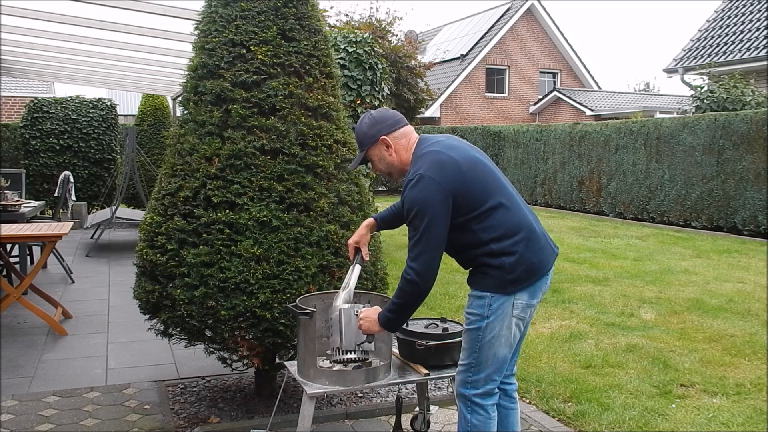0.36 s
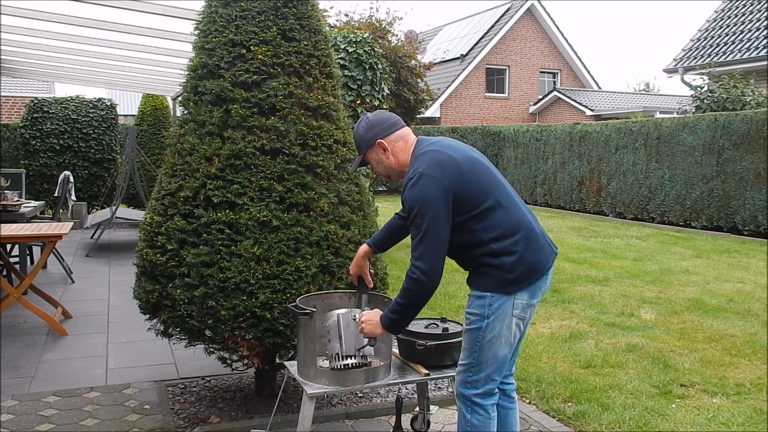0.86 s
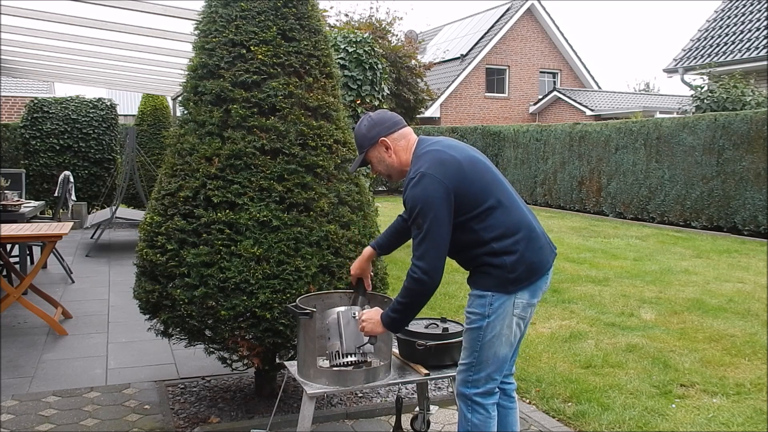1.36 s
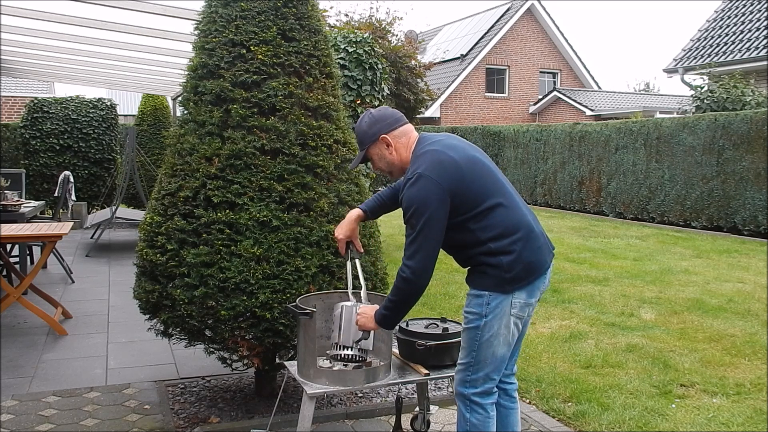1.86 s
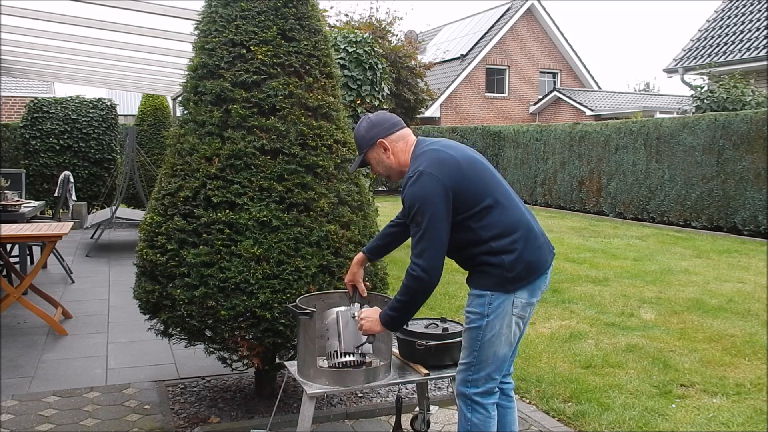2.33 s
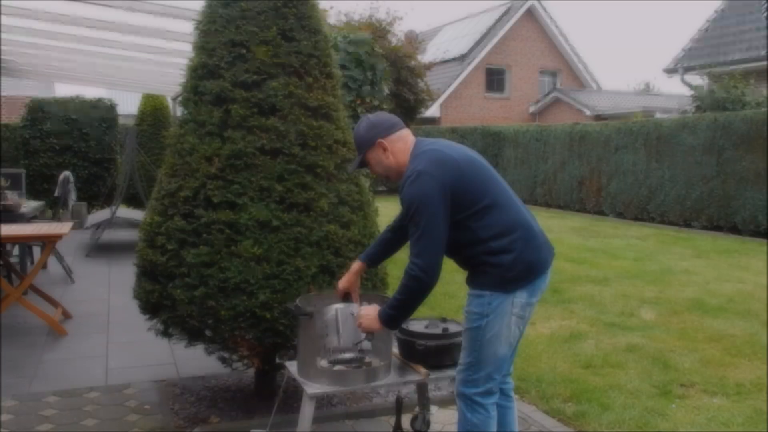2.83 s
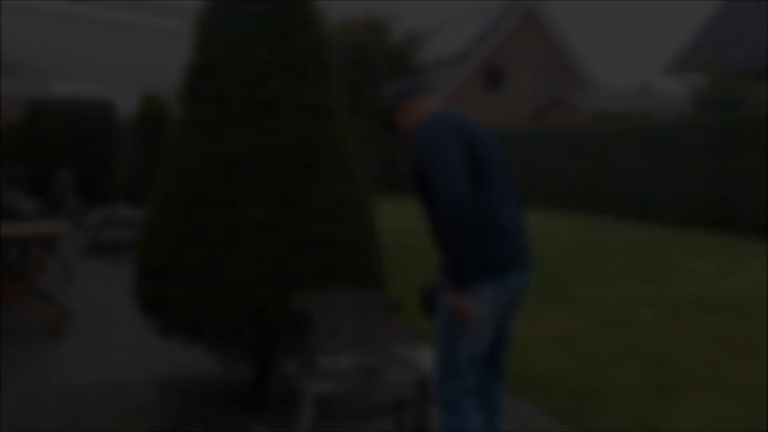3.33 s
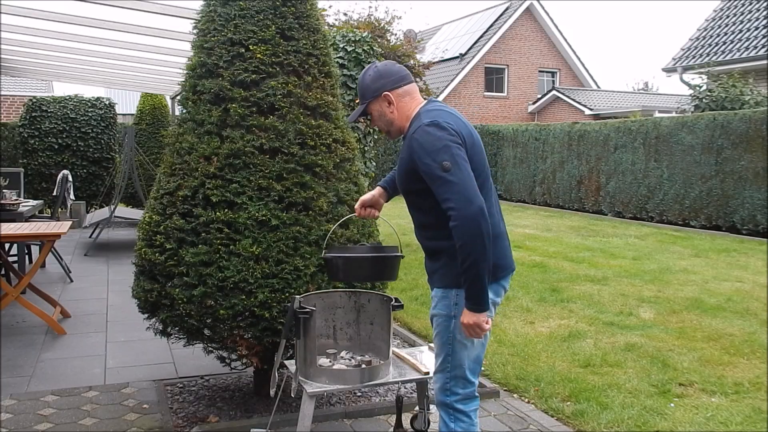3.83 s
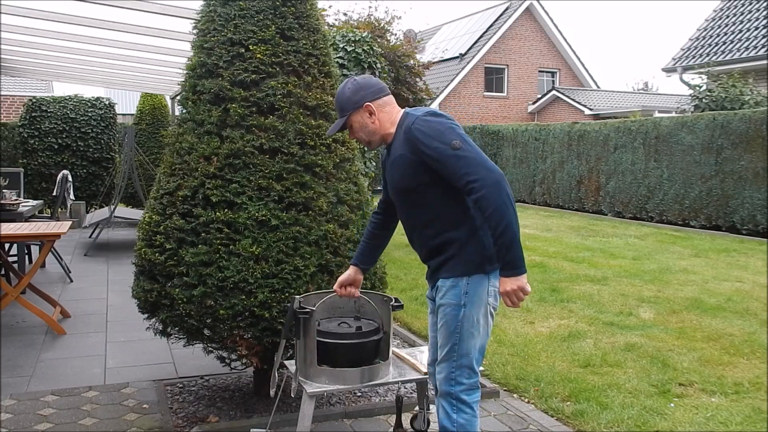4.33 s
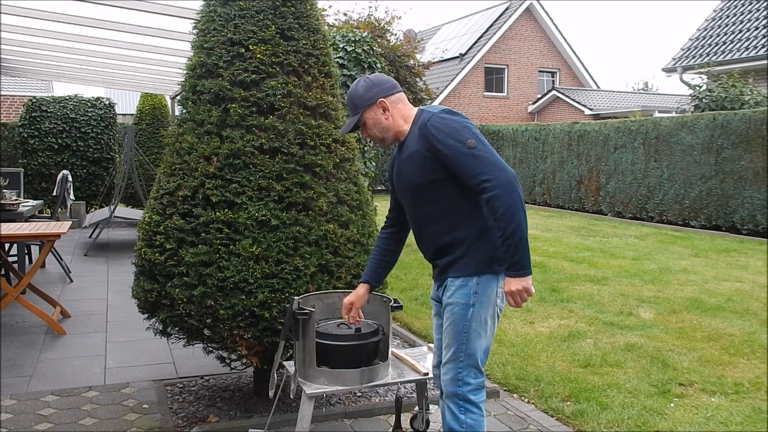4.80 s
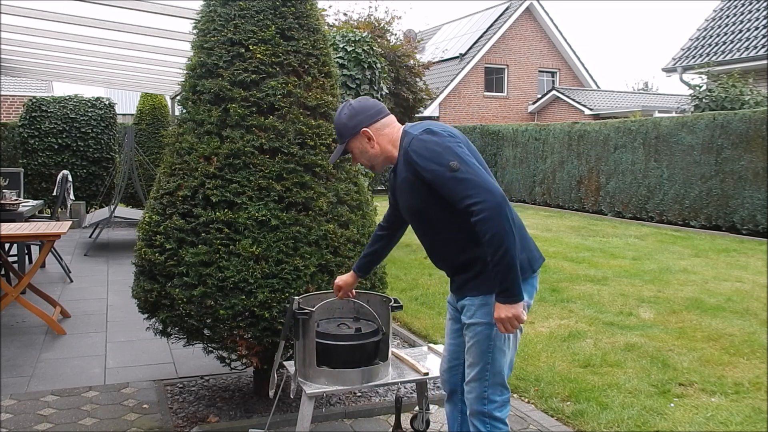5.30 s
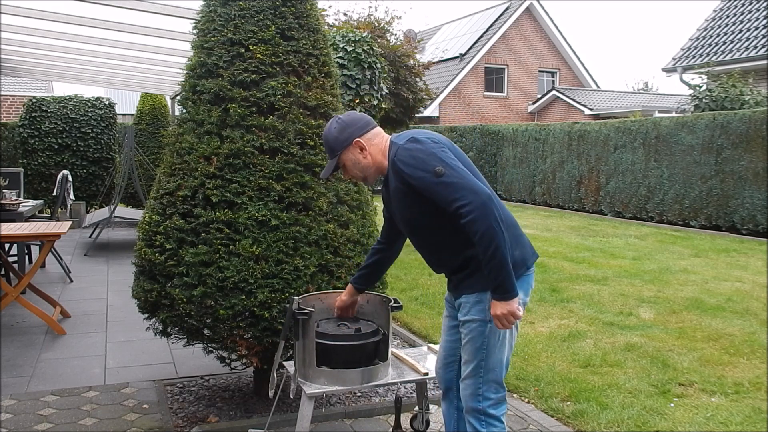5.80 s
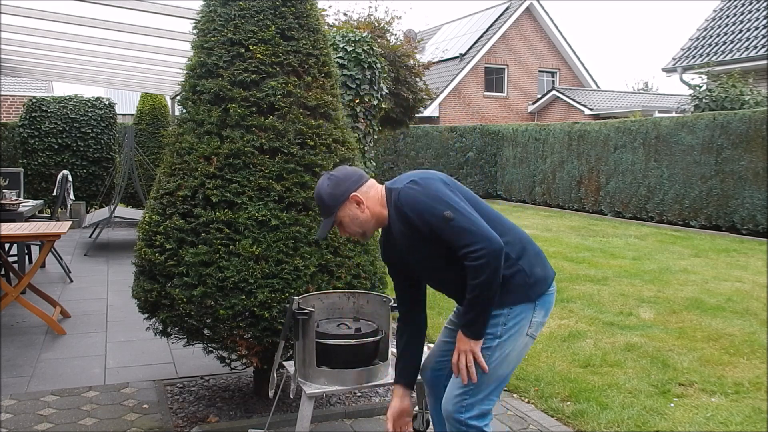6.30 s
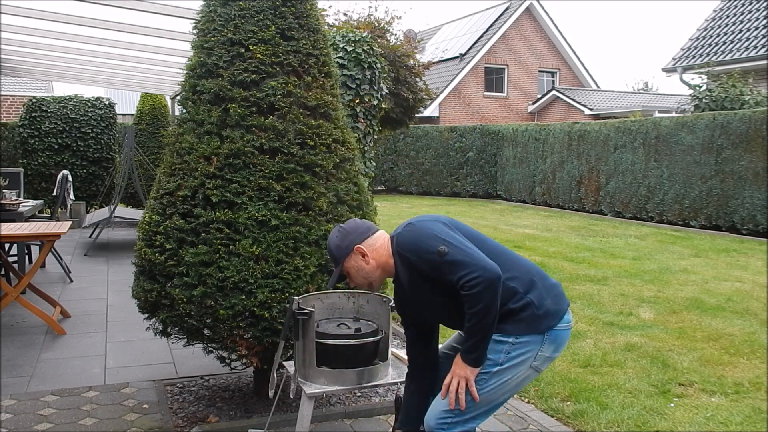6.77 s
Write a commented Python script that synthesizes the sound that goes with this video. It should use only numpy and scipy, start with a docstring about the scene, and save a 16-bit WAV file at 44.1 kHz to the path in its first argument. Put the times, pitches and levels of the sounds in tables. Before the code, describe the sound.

Coals and metal tongs knock a booming thin steel can in a quiet garden, then a cast-iron pot crunches down and its wire handle ticks and drops.

```python
"""A sheet-steel can booms softly at each knock as tongs lift hot coals out of it in a garden; the tongs clink.
A cast-iron pot grinds down onto the coals, its wire handle ticks and drops on the rim, the can is lifted again.
Each contact sums decaying modes of the struck body with a gritty noise burst, set in three frequency ranges.
Distant traffic and leaves, as shaped noise, fill the gaps; a small stereo camera listens from a few metres."""
import sys
import numpy as np
from scipy import signal
from scipy.fft import rfft, irfft
from scipy.io import wavfile
from scipy.ndimage import uniform_filter1d

SR = 44100
rng = np.random.default_rng(int(sys.argv[2]) if len(sys.argv) > 2 else 0)


def gain_from_db(level_db):
    """Turn a decibel level (scalar or array-like) into a linear amplitude factor."""
    decades = np.asarray(level_db, float) / 20
    return 10 ** decades


def log_audio(samples):
    """Write samples as a 16-bit WAV file to the path given in sys.argv[1]."""
    # one column per channel
    frames = np.atleast_2d(samples).T
    # limit to full scale, then quantise
    limited = np.clip(frames, -1, 1)
    pcm = np.round(limited * 32767).astype(np.int16)
    wavfile.write(sys.argv[1], SR, pcm)


N = 315315  # samples in the scene
BASS_HZ, TREBLE_HZ = 1200, 4000  # edges between bass, middle and treble
SPAN = 12288  # samples kept of each contact
T = np.arange(SPAN) / SR  # time since the contact began [s]


def shape(hz, points):
    """Filter magnitude: interpolates (frequency [Hz], gain [dB]) points on a logarithmic frequency axis."""
    f, db = np.transpose(points)
    return gain_from_db(np.interp(np.log(hz + 1), np.log(f), db))


def walk(rate):
    """Low-pass random modulation: levels held 1 / rate s and slewed twice, with a spread near 1."""
    k = int(SR / rate)
    held = np.repeat(rng.standard_normal(N // k + 1), k)
    return 1.6 * uniform_filter1d(uniform_filter1d(held, k), k)[:N]


def thirds(hz):
    """Complementary crossover: treble, middle and bass shares of a spectrum, adding up to 1."""
    above_treble, above_bass = [1 / (1 + (edge / (hz + 1)) ** 6) for edge in (TREBLE_HZ, BASS_HZ)]
    return above_treble, above_bass - above_treble, 1 - above_bass


def pan(x, left_over_right_db):
    """Interchannel level difference: half the decibels go to each side."""
    return x * gain_from_db(np.array([[left_over_right_db], [-left_over_right_db]]) / 2)


# spectral slope of traffic and leaves: (frequency [Hz], relative level [dB])
GARDEN_SPECTRUM = [(18, -26), (38, -15), (58, -40), (76, -10), (105, -1.5), (157, 2.5), (200, -2.5),
                   (240, -8), (437, -8), (499, -10.5), (801, -14.5), (1130, -18.5), (3400, -24.5),
                   (16000, -38)]
# raised hissy bands: (frequency [Hz], width [Hz], gain at the centre [dB])
HISS_BANDS = [(2267, 110, 10), (3425, 200, 8.5), (7440, 560, 5), (9770, 930, 2.5)]
# rms level of each range before panning: (time [s], rumble [dB], low middle [dB], middle [dB], treble [dB])
BACKGROUND_LEVELS = [(0.0, -65, -64, -66, -70), (0.44, -67, -65.5, -65.5, -69),
                     (2.69, -64, -66, -66.5, -69.5), (2.9, -65, -61.5, -63.5, -65.5),
                     (3.5, -64, -61, -62, -63.5), (3.842, -65.5, -69, -67, -68.5),
                     (6.0, -69.5, -65.5, -66, -68.5), (6.4, -67, -66, -66, -63.5),
                     (6.8, -73, -70.5, -64.5, -70), (7.15, -63, -65.5, -67, -65)]


def garden():
    """Partly correlated shaped noise: octave bands flicker independently, four broad ranges follow their own
    levels over time; the background is louder around 2.8-3.8 s."""
    hz, t = np.fft.rfftfreq(N, 1 / SR), np.arange(N) / SR
    # the two ports hear much of it alike
    unlike = shape(hz, [(60, -13.0), (300, -5.0), (1000, -4.5), (4000, -4.5), (14000, -1.5)])
    hiss_db = sum(db / (1 + (2 * (hz - f) / width) ** 2) for f, width, db in HISS_BANDS)
    mid, side = rfft(rng.standard_normal((2, N))) * shape(hz, GARDEN_SPECTRUM) * gain_from_db(hiss_db)
    pair = np.array([mid + unlike * side, mid - unlike * side])
    noise = 0
    for centre in 45 * 2. ** np.arange(9):
        octave = np.cos(np.pi / 2 * np.clip(np.log2((hz + 1) / centre), -1, 1)) ** 2
        flicker_db = (2 if centre < 400 else 1.4) * walk(6)
        noise = noise + irfft(octave * pair, N) * gain_from_db(flicker_db)
    treble, middle, bass = thirds(hz)
    rumble = 1 / (1 + (hz / 300) ** 4)
    s, *range_db = np.transpose(BACKGROUND_LEVELS)
    out = 0
    for share, db in zip((rumble, bass - rumble, middle, treble), range_db):
        part = irfft(share * rfft(noise), N)
        out = out + part / part.std() * gain_from_db(np.interp(t, s, db))
    return pan(out, -0.35)


def yard(x, t60=0.2, wet_db=-22, unlike=0.22):
    """Diffuse reflection: paving, hedge and house wall send back a short, exponentially decaying scatter."""
    t = np.arange(int(.4 * SR)) / SR
    envelope = np.exp(-np.log(1000) * t / t60) * np.clip(t / 0.036, 0, 1) ** 2
    mid, side = rng.standard_normal((2, len(t))) * envelope
    side = unlike * np.diff(side, prepend=0)
    tail = np.array([mid + side, mid - side]) / np.sqrt(np.sum(mid ** 2))
    return gain_from_db(wet_db) * signal.fftconvolve(x.mean(0)[None], tail, axes=1)[:, :N]


def near_spot(hz, spot_hz, focus_db):
    """Selective excitation: the spot struck favours frequencies close to spot_hz."""
    return gain_from_db(focus_db * np.exp(-(np.log((hz + 1) / spot_hz) / 0.071) ** 2))


def ring_modes(modes, contact, spot_hz, focus_db, scatter_db):
    """Modal superposition: damped sinusoids, sustained while in contact and slightly different each time."""
    f, width, db = np.transpose(modes)[:, :, None]
    strength = gain_from_db(db + scatter_db * rng.standard_normal(f.shape)) * near_spot(f, spot_hz, focus_db)
    # the hold pulls the nearest mode onto the favoured pitch
    off = np.abs(np.log(f / spot_hz))
    strayed = f * (1 + 0.005 * rng.standard_normal(f.shape))
    held = np.where((off == off.min()) & (off < .08), spot_hz, strayed)
    # while the parts still rub, high modes are kicked out of step; they turn gritty above 5130 Hz
    kicks = rng.standard_normal((len(f), SPAN // 8)).repeat(8, axis=1) * (T < contact)
    slip = np.cumsum(kicks * np.sqrt(width / SR) * f / 5130, axis=1)
    # a blow starts the modes nearly in step
    wave = np.sin(2 * np.pi * (held * T + 0.38 * rng.random(f.shape)) + slip)
    decay = np.exp(-np.pi * width * np.maximum(T - contact, 0))
    return np.sum(strength * wave * decay, axis=0)


def rough_noise(crack_db, grit):
    """Impulsive noise: a sharp crack at first touch, then loose parts chatter every few milliseconds."""
    # a few grains bite harder than the rest
    bites = gain_from_db(grit * uniform_filter1d(np.minimum(rng.exponential(size=SPAN), 4) ** 2, size=8))
    steps = np.repeat(rng.standard_normal(SPAN // 128), 128)
    chatter = gain_from_db(1.5 * uniform_filter1d(steps, size=64))
    crack = 1 + gain_from_db(crack_db) * np.exp(-T / 0.00061)
    return rng.standard_normal((2, SPAN)) * bites * chatter * crack


def strike(contacts, modes, ring_db, fade_s, soft, crack_db, grit, scatter_db, focus_db,
           low_hz, dip_db, top_db, pan_db, wide_db):
    """Contact excitation: each blow rings the modes near its spot over a gritty fading clatter.

    contacts: (time [s], treble, middle, bass peak [dB], contact [s], favoured frequency [Hz]).
    ring_db (ring over clatter) and fade_s hold treble, middle, bass."""
    out, hz = np.zeros((2, N + SPAN)), np.fft.rfftfreq(SPAN, 1 / SR)
    slope = shape(hz, [(low_hz / 6, -70), (low_hz / 2, -24), (low_hz, 0), (2200, 0),
                       (3200, dip_db), (7000, 0), (16000, top_db)])
    radiates = shape(hz, [(60, -40), (300, 0)])
    apart = shape(hz, [(500, wide_db - 36.0), (10000, wide_db)])
    for s, *peak_db, contact, spot_hz in contacts:
        after = np.maximum(T - contact, 0)
        rise = np.sin(np.pi / 2 * np.clip(T / (soft * contact + 0.0018), 0, 1)) ** 2
        ring = rfft(rise * ring_modes(modes, contact, spot_hz, focus_db, scatter_db)) * radiates
        noise = rough_noise(crack_db, grit) * rise
        # countless small modes give each contact its own ragged colour
        ragged = gain_from_db(3.5 * np.interp(hz, np.linspace(0, SR / 2, num=120), rng.standard_normal(size=120)))
        colour = slope * ragged * np.sqrt(near_spot(hz, spot_hz, focus_db))
        pair, k = 0, int(s * SR)
        for share, top, sing_db, fade in zip(thirds(hz), peak_db, ring_db, fade_s):
            # longer contacts shake more loose parts, which settle later
            settle = np.exp(-np.log(1000) * after / (fade + 3 * contact))
            clatter = rfft(noise * settle) * colour * share
            tone = share * ring
            power = np.sum(np.abs(clatter[0]) ** 2) / (np.sum(np.abs(tone) ** 2) + 1e-9)
            mid = irfft(clatter[0] + gain_from_db(sing_db) * np.sqrt(power) * tone)
            side = irfft(apart * clatter[1]) * np.hypot(1, gain_from_db(sing_db))
            peak = np.sqrt(uniform_filter1d(mid ** 2, size=88).max())  # loudest 2 ms
            pair = pair + gain_from_db(top) / peak * np.array([mid + side, mid - side])
        out[:, k:k + SPAN] += pair * np.clip(4 - 4 * T / T[-1], 0, 1)
    return pan(out[:, :N], pan_db)


def follow(lead_db, base_db, gain):
    """Level law: a range sits at base_db when the leading one is at -45 dB, and gains `gain` dB per dB."""
    return base_db + gain * (lead_db + 45)


# the can's loose grip rattling: (time [s], treble peak [dB], contact [s], favoured frequency [Hz])
GRIP_RATTLES = [(6.586, -53, 0.036, 11000), (6.5972, -46.5, 0.0066, 4600), (6.6409, -40.5, 0.0031, 8560),
                (6.651, -41.5, 0.0068, 8500), (6.6696, -54, 0.023, 8240), (6.702, -42.5, 0.012, 9620),
                (6.7306, -37.5, 0.0051, 13000), (6.759, -51.5, 0.015, 9100), (6.819, -48.5, 0.0055, 11400),
                (6.827, -44.5, 0.0094, 6100)]
# vibration modes of the grip: (frequency [Hz], width [Hz], relative level [dB])
GRIP_MODES = [(3770, 40, -18), (4950, 74, -13), (5900, 47, -7), (6300, 36, -5), (7600, 34, 0),
              (7520, 40, -10), (8300, 28, -1), (8950, 53, -12), (9100, 15, -4), (9620, 120, 0),
              (10100, 51, 4), (10700, 54, 1), (13000, 79, -1)]


def grip_rattle():
    """Repeated impact in a loose joint: small high modes rattle as the can is lifted."""
    rows = []
    for s, db, c, hz in GRIP_RATTLES:
        middle = db + 2 - 19.5 * np.log2(hz / TREBLE_HZ)  # higher spots carry less middle
        rows.append((s, db, middle, -64.5, c, hz))
    return strike(rows, GRIP_MODES, ring_db=(-0.7, -5, -9), fade_s=(.08, .08, .08), soft=0.071, crack_db=-10,
                  grit=0.64, scatter_db=2.5, focus_db=14.0, low_hz=465, dip_db=-1, top_db=-6.5,
                  pan_db=-1.5, wide_db=-10)


# wire handle on the pot's ears and rim:
# (time [s], treble peak [dB], middle over treble [dB], contact [s], favoured frequency [Hz])
HANDLE_TICKS = [(4.831, -61, -2, 0.0047, 8800), (4.878, -52, -11, 0.002, 6720),
                (4.948, -48.5, -6.5, 0.0043, 6960), (5.0796, -45, -5, 0.0023, 7360),
                (5.0881, -45.5, -3, 0.009, 11700), (5.1677, -65, 4.5, 0.024, 6100),
                (5.235, -49, -5, 0.0061, 6800), (5.245, -38.5, -9.5, 0.0049, 7000),
                (5.4052, -49, -1.5, 0.0073, 8160), (5.497, -62, 1.5, 0.014, 6100),
                (5.541, -58, 6, 0.0076, 5900), (5.5675, -40.5, -3, 0.0049, 6170),
                (5.5815, -44, -5, 0.013, 5900), (5.597, -31.5, -7, 0.0068, 6000),
                (5.921, -51.5, -6, 0.011, 5600), (5.9281, -34, -5.5, 0.008, 6100),
                (5.968, -68, 10, 0.033, 5720), (6.004, -60, 9.5, 0.02, 6070),
                (6.0278, -63.5, 11, 0.015, 6260), (6.0762, -42.5, -14, 0.0045, 6200),
                (6.086, -32, -8.5, 0.0086, 6800), (6.097, -57.5, 12.5, 0.0082, 1040),
                (6.1613, -33, -13.5, 0.0078, 6230), (6.187, -19, -13, 0.0082, 6960)]
# vibration modes of the handle: (frequency [Hz], width [Hz], relative level [dB])
HANDLE_MODES = [(311, 21, -14.5), (628, 18.6, -12), (737, 14, -20), (1040, 25, -14), (1251, 18, -7),
                (1570, 10.6, -13.5), (2300, 25, -34), (2450, 31, -26), (3265, 17, -17), (3690, 15, -9.5),
                (5300, 130, -13), (5570, 72, 12.5), (6100, 30, 11.5), (6500, 37, 14), (6960, 14, 6),
                (7070, 40, 18), (7530, 450, 1), (8260, 84, 16), (9200, 130, 8), (10280, 134, 24),
                (11680, 250, 24), (13000, 61, 16)]


def handle_ticks():
    """Bar vibration: the wire handle ticks and drops on the rim, ringing mostly in its high modes."""
    rows = [(s, db, db + up, db + up - 4.5, c, hz) for s, db, up, c, hz in HANDLE_TICKS]
    return strike(rows, HANDLE_MODES, ring_db=(-0.5, 1.5, 6), fade_s=(.035, .06, .07), soft=0.088, crack_db=18.5,
                  grit=0.38, scatter_db=3.5, focus_db=9, low_hz=423, dip_db=-6.5, top_db=-10.5,
                  pan_db=-0.6, wide_db=-10)


# the pot's feet landing and crushing coal: (time [s], middle peak [dB], bass over middle [dB], contact [s])
POT_LANDINGS = [(4.4074, -30.5, 6.5, 0.0091), (4.4263, -24.5, 1, 0.018), (4.4442, -28, -12, 0.018),
                (4.4644, -34.5, -0.5, 0.0083), (4.481, -48.5, 10, 0.016)]
# vibration modes of the cast-iron pot: (frequency [Hz], width [Hz], relative level [dB])
POT_MODES = [(185, 37, -3), (458.5, 27, 2.5), (527, 54, 3.5), (624.5, 79, 2), (798, 22, -4),
             (907, 30, -7.5), (1048, 32, -7), (1264, 18, -7), (1417, 32, 0.5), (1563, 40, 2),
             (1713, 43, -1), (1926, 57, 3), (2085, 68, -1), (2250, 25, -4), (2400, 40, -8), (2450, 30, -5),
             (2640, 42, -16), (3900, 12, -8), (4657, 52, -2)]


def pot_landing():
    """Damped impact: the pot's broad low modes sound under a crunch, the feet favouring 617 Hz."""
    rows = [(s, db - 7.5, db, db + up, c, 617) for s, db, up, c in POT_LANDINGS]
    return strike(rows, POT_MODES, ring_db=(-15, 0, 11), fade_s=(.06, .07, .05), soft=0.036, crack_db=-4,
                  grit=0.35, scatter_db=2.5, focus_db=10, low_hz=434, dip_db=-4.5, top_db=-6.5,
                  pan_db=-1.5, wide_db=-9.0)


# the tongs' arms clinking:
# (time [s], treble peak [dB], middle over treble [dB], contact [s], favoured frequency [Hz])
TONG_CLINKS = [(2.863, -55.5, -3, 0.0066, 7500), (2.9394, -41, -5.5, 0.026, 6640),
               (2.962, -49, -2, 0.022, 5700), (2.996, -40.5, -15, 0.0049, 6300),
               (3.0016, -28.5, -29, 0.003, 9640), (3.009, -34, -19, 0.011, 7600),
               (3.0643, -22.5, -14, 0.0029, 10470), (3.0876, -22.5, -22.5, 0.0034, 5800),
               (3.243, -40.5, -2.5, 0.001, 6470), (3.3549, -56.5, 0.5, 0.0025, 5420),
               (3.7705, -46.5, -2.5, 0.0096, 6520)]
# vibration modes of the tongs: (frequency [Hz], width [Hz], relative level [dB])
TONG_MODES = [(635, 15, -19.5), (1630, 46, -12), (2420, 26, -24), (3690, 21, -10), (5200, 130, 5),
              (5800, 140, 9), (6000, 20, -3), (7000, 240, 14), (7600, 110, -19), (8600, 133, -8),
              (9380, 150, 6.5), (10630, 99, 4.5), (13200, 280, 15), (13340, 230, 5)]


def tong_clinks():
    """Bar vibration: the arms clink together and each spot struck picks out its own high modes."""
    rows = [(s, db, db + up, follow(db, -55.5, 0.54), c, hz) for s, db, up, c, hz in TONG_CLINKS]
    return strike(rows, TONG_MODES, ring_db=(-1, 0, 3), fade_s=(.045, .07, .1), soft=0.024, crack_db=5,
                  grit=0.36, scatter_db=11.0, focus_db=17.5, low_hz=450, dip_db=-7.0, top_db=-10.5,
                  pan_db=-1.0, wide_db=-9.0)


# vibration modes of the steel can, for scrapes, coals and knocks:
# (frequency [Hz], width [Hz], relative level [dB])
CAN_MODES = [(352, 41, -6.5), (536, 13, -8), (625.6, 19.6, 10.5), (785, 14, -8), (950, 40, -7),
             (1098, 9, -6), (1297, 54, -2), (1420, 12, -6), (1664, 16, -9), (1715, 11, -13),
             (2045, 16, -7.5), (2560, 140, -21), (3630, 14, -29), (4270, 66, -37), (6920, 190, -25),
             (2260, 53, -10.5)]
# ash and coal scraped along: (time [s], treble peak [dB], contact [s], favoured frequency [Hz])
SCRAPES = [(0.304, -49.5, 0.047, 6100), (0.3748, -58, 0.0081, 4520), (0.5287, -63, 0.0062, 4350),
           (0.6915, -60.5, 0.0075, 4360), (1.724, -55, 0.016, 6500), (1.9735, -58, 0.026, 7600),
           (2.0502, -59, 0.0049, 6700), (3.051, -44, 0.0098, 7400), (3.455, -47.5, 0.02, 10200),
           (3.6884, -56, 0.014, 5570), (5.5213, -52.5, 0.01, 6050)]


def ash_scrapes():
    """Friction noise: ash and coal dragged along the can make grit, and barely move its body."""
    rows = [(s, db, follow(db, -64, 0.33), follow(db, -53.5, 1), c, hz) for s, db, c, hz in SCRAPES]
    return strike(rows, CAN_MODES, ring_db=(-6, -4, 3), fade_s=(.04, .05, .06), soft=0.13, crack_db=-9,
                  grit=1.0, scatter_db=10.0, focus_db=8, low_hz=394, dip_db=4.0, top_db=-4.5,
                  pan_db=-1.5, wide_db=-8.5)


# a coal tumbling against the steel wall:
# (time [s], middle peak [dB], bass over middle [dB], contact [s], favoured frequency [Hz])
COAL_TUMBLES = [(2.1833, -37.5, -12, 0.015, 1098), (2.2106, -33, -5, 0.012, 1246),
                (2.222, -35, -10.5, 0.021, 655), (2.2404, -35.5, -1.5, 0.009, 1644),
                (2.478, -58.5, 12, 0.022, 785), (2.7212, -56.5, 14.5, 0.011, 623),
                (3.1783, -53.5, 8.5, 0.0046, 1010)]


def coal_tumbles():
    """Impact on a thin shell: a tumbling coal sets the can's modes ringing under its own clatter."""
    rows = [(s, follow(db, -54, 0.78), db, db + up, c, hz) for s, db, up, c, hz in COAL_TUMBLES]
    return strike(rows, CAN_MODES, ring_db=(-8, 0, 7), fade_s=(.06, .08, .08), soft=0.024, crack_db=12,
                  grit=0.74, scatter_db=4, focus_db=10.5, low_hz=398, dip_db=-2.5, top_db=-8.0,
                  pan_db=-0.9, wide_db=-9.5)


# coals and tongs knocking the can:
# (time [s], bass peak [dB], treble over bass [dB], contact [s], favoured frequency [Hz])
CAN_KNOCKS = [(0.0034, -47, -28, 0.019, 636), (0.0278, -33, -32, 0.0077, 622),
              (0.0494, -40, -23, 0.0088, 980), (0.1534, -49.5, -57, 0.012, 635),
              (0.2224, -51, -52, 0.017, 635), (0.263, -59.5, -16, 0.034, 2260),
              (0.7714, -56, 13.5, 0.014, 1306), (0.7772, -47.5, 14, 0.0034, 960),
              (0.7874, -41.5, -34, 0.0075, 635), (0.8085, -39.5, -20, 0.0072, 1078),
              (0.8205, -42.5, -8, 0.005, 2130), (0.8344, -41.5, -20, 0.015, 1085),
              (0.8744, -52.5, -17, 0.026, 1075), (1.066, -57, -5.5, 0.0086, 615),
              (1.1009, -59.5, -8, 0.041, 630), (1.1494, -62.5, -2.5, 0.018, 656),
              (1.2897, -57, -13, 0.025, 1500), (1.3249, -60, 22.5, 0.005, 2045),
              (1.3291, -39, -15.5, 0.015, 628), (1.8023, -57, 19.5, 0.0099, 2045),
              (1.8828, -59, 3, 0.012, 910), (2.3156, -55.5, 0, 0.007, 1420),
              (2.7764, -44, -19.5, 0.021, 600), (2.8164, -47, -14, 0.0044, 1784),
              (2.842, -55.5, -7, 0.043, 1074), (3.1294, -53, 0, 0.015, 1110),
              (3.1864, -52, -36, 0.025, 633), (3.2124, -41, -21, 0.016, 614),
              (3.2614, -53, -12, 0.0062, 1730), (3.2864, -44.5, -23, 0.016, 1100),
              (3.335, -49, -43, 0.013, 1085)]


def can_knocks():
    """Shell resonance: knocks make the sheet steel boom, its bass ring standing well above the clatter."""
    # the middle sits 0.62 of the way from bass to treble, less 2 dB
    rows = [(s, db + up, db + 0.62 * up - 2, db, c, hz) for s, db, up, c, hz in CAN_KNOCKS]
    return strike(rows, CAN_MODES, ring_db=(-10, 2, 15), fade_s=(.04, .06, .07), soft=0.11, crack_db=30.5,
                  grit=0.73, scatter_db=3.5, focus_db=10.0, low_hz=370, dip_db=1.5, top_db=-7.5,
                  pan_db=0.2, wide_db=-9.5)


def scene():
    """Linear superposition: the garden, all contacts near the middle, and their scatter from the yard."""
    background = garden()
    hits = (grip_rattle() + handle_ticks() + pot_landing() + tong_clinks()
            + ash_scrapes() + coal_tumbles() + can_knocks())
    return background + hits + yard(hits)


def top_cut(x):
    """Nothing passes above the cut-off."""
    return signal.sosfilt(signal.butter(12, 16670, fs=SR, output="sos"), x)


def record(dry):
    """Receiver response: the port spacing leaves a narrow notch, and the extreme top is cut."""
    hz = np.fft.rfftfreq(N, 1 / SR)
    notch_db = -9 / (1 + ((hz - 5050) / 60) ** 2)
    top = shape(hz, [(15900, 0), (16150, -16), (16650, -18), (16800, -70)])
    mix = irfft(rfft(dry) * gain_from_db(notch_db) * top, N)
    return top_cut(mix)


dry = scene()
out = record(dry)
log_audio(out)
```